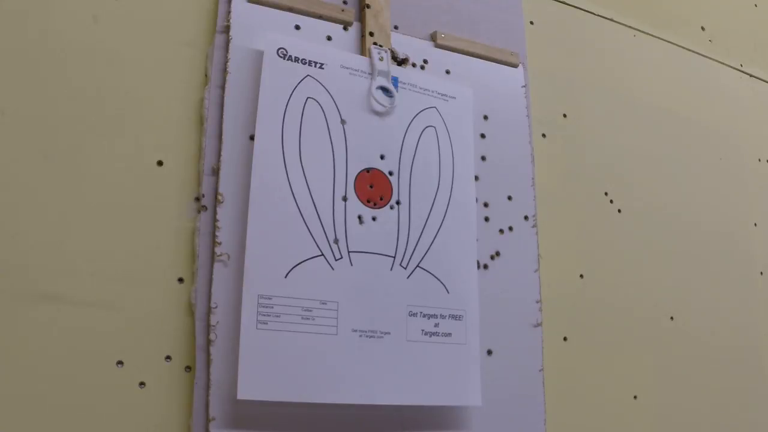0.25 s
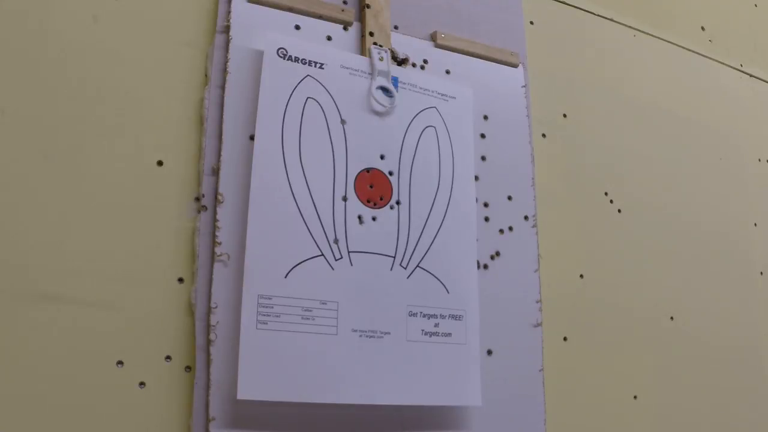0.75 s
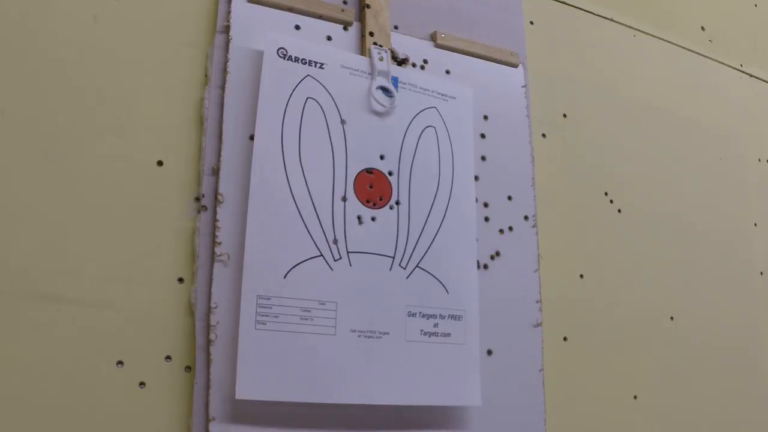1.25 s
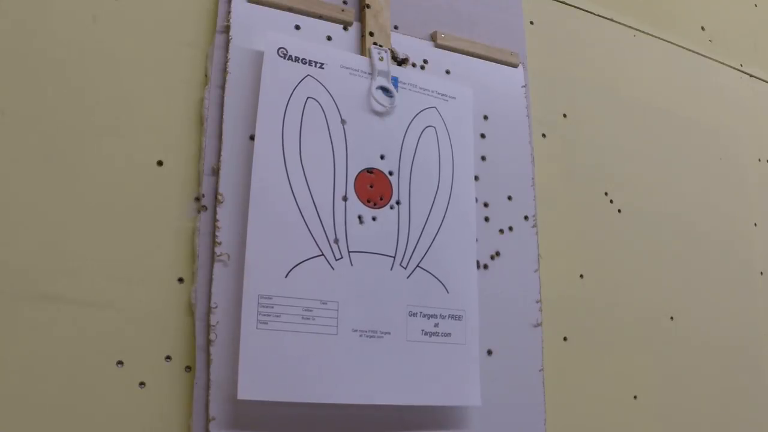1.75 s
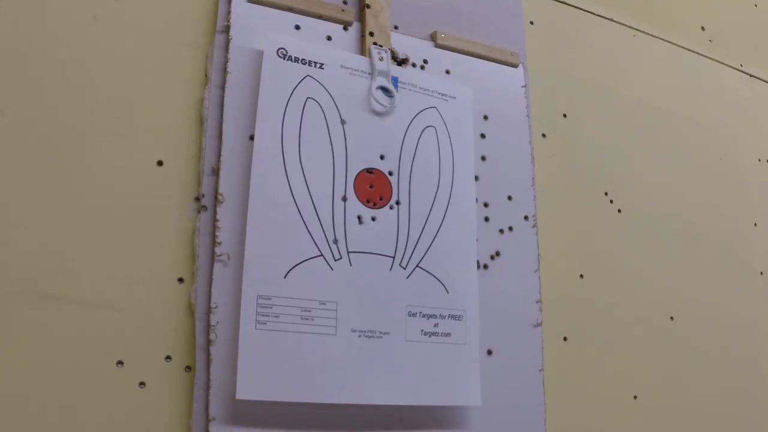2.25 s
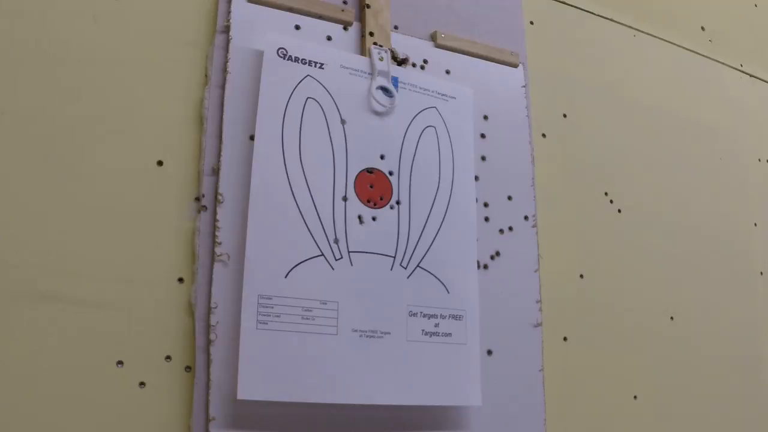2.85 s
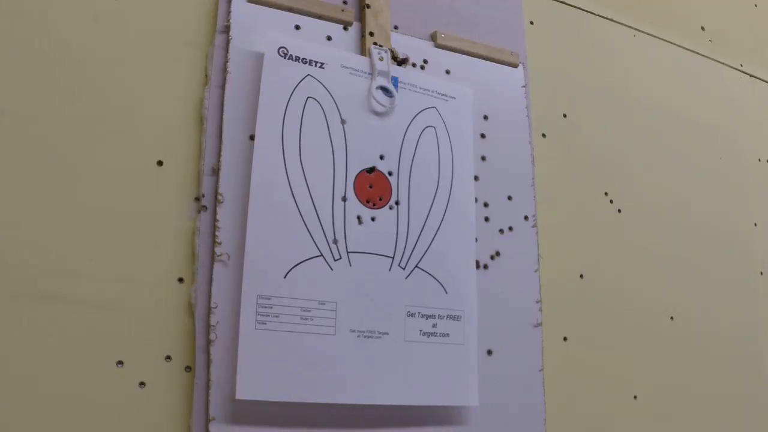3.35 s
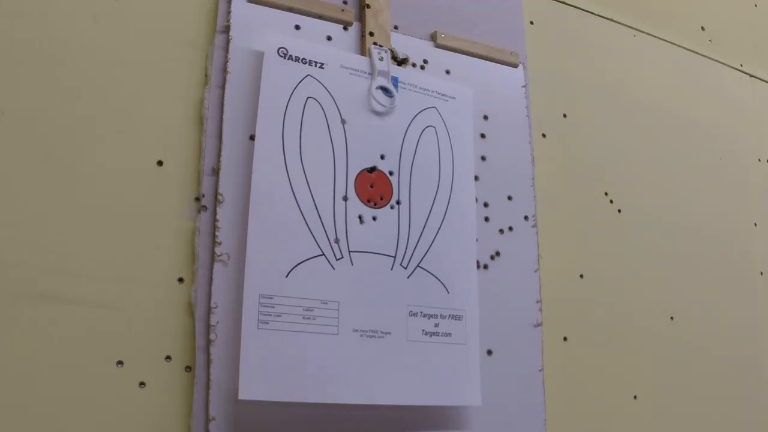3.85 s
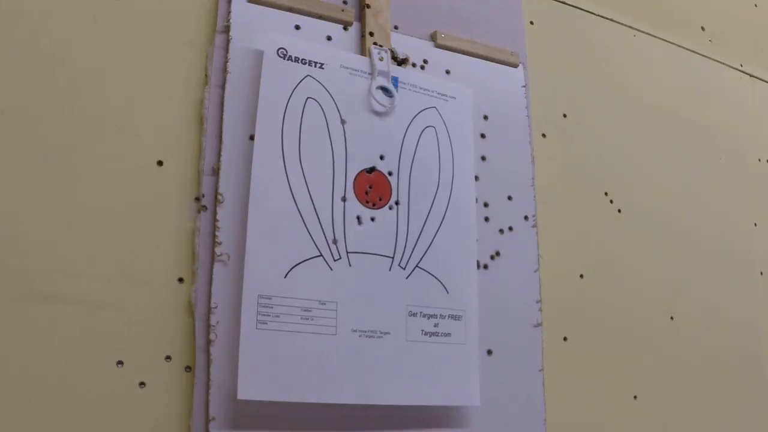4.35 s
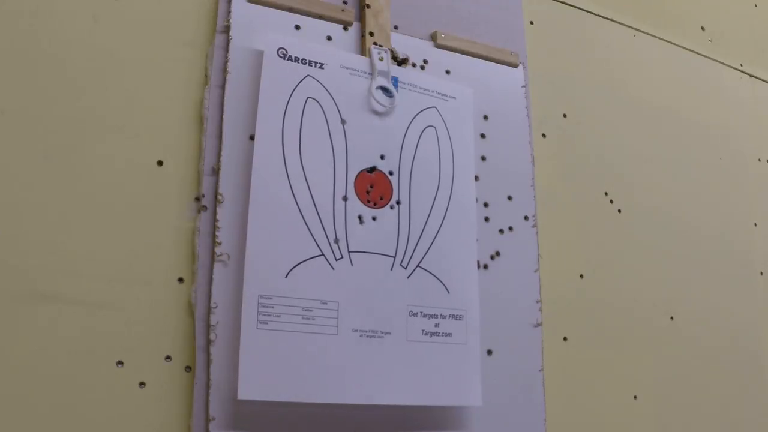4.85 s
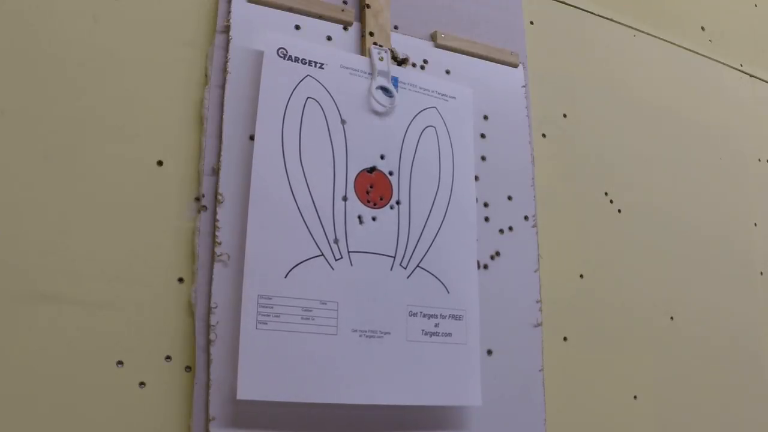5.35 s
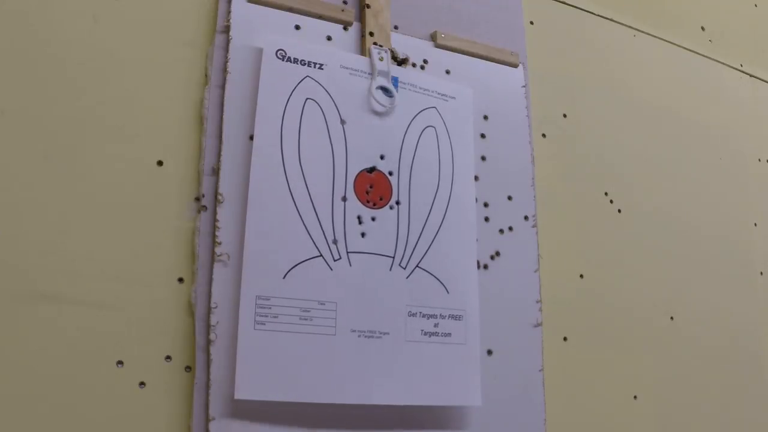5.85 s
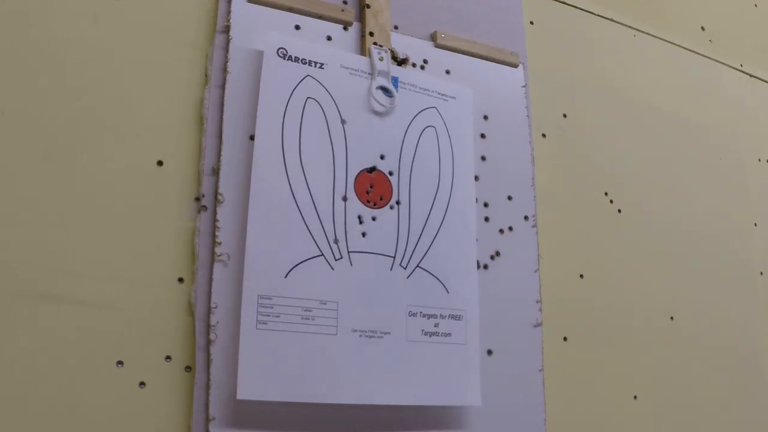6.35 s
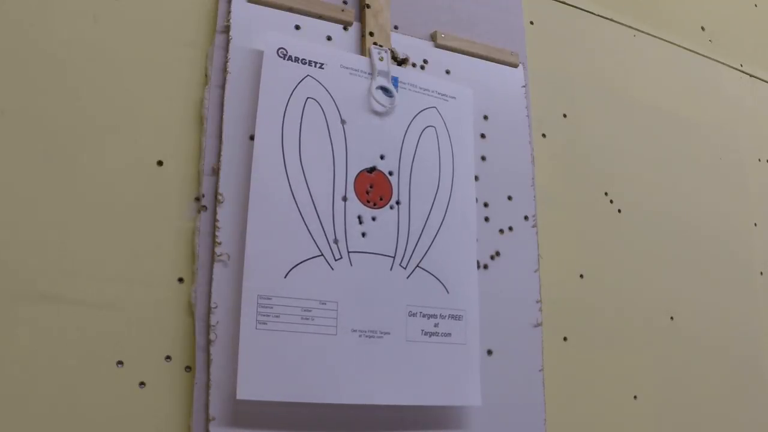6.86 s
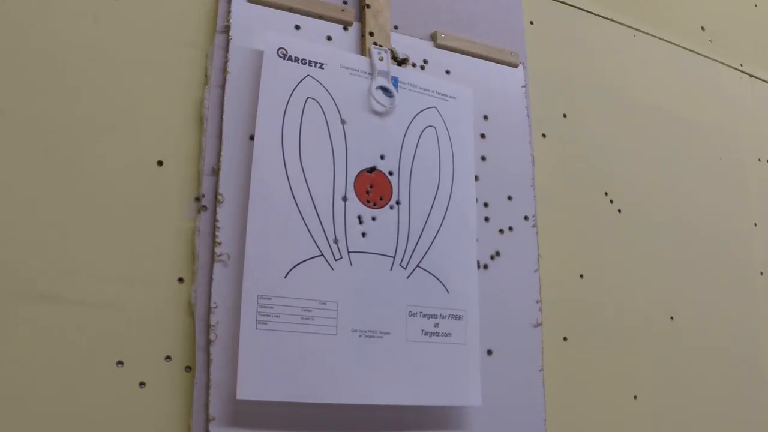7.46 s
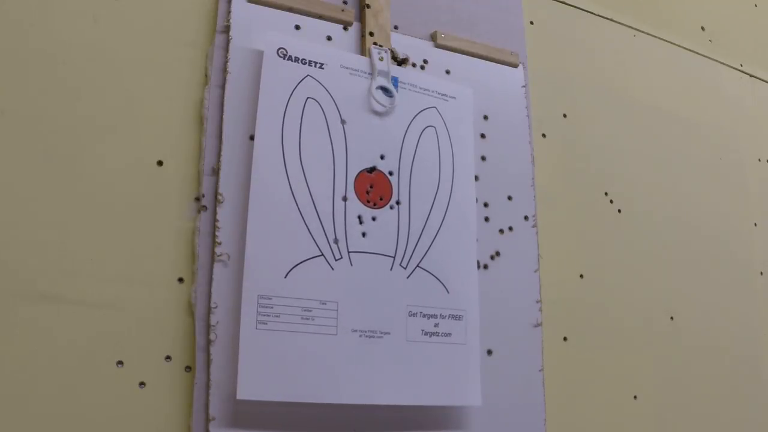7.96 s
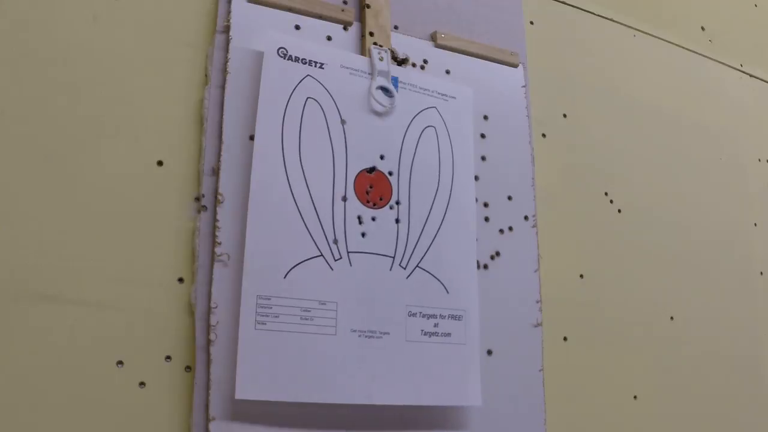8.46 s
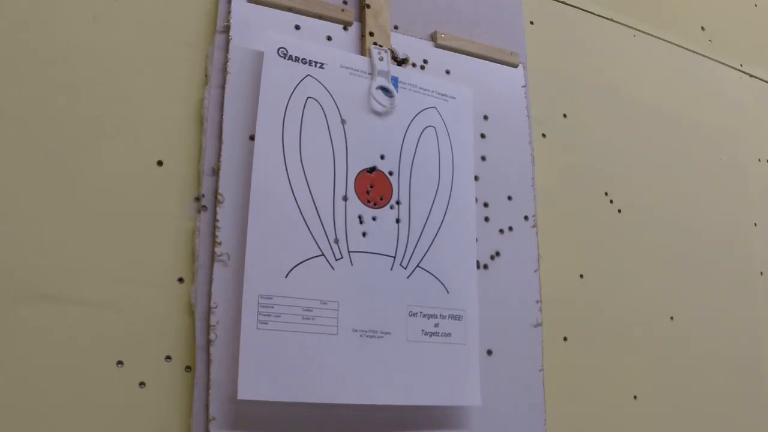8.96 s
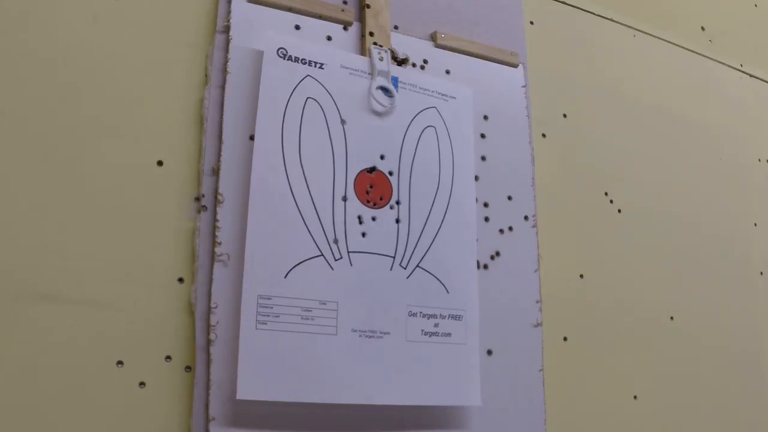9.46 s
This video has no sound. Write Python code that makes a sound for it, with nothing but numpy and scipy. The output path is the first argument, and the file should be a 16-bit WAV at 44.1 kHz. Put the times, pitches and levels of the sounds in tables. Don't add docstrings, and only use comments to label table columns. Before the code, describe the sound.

Heard from beside the target, five overloaded pistol cracks slap and echo through a hard hall, with spent cases clinking between them over rumbling air.

```python
import sys
import numpy as np
from scipy import signal
from scipy.fft import rfft, irfft
from scipy.io import wavfile

SR = 44100
rng = np.random.default_rng(int(sys.argv[2]) if len(sys.argv) > 2 else 0)


def wav_record(signal):
    frames = np.transpose(np.atleast_2d(signal))
    bounded = np.clip(frames, -1, 1)
    quanta = np.round(bounded * 32767).astype(np.int16)
    wavfile.write(sys.argv[1], SR, quanta)


def ratio_of_db(decibels):
    return 10 ** (np.asarray(decibels, float) / 20)


N = 427769


def band(x, hz, width):
    return signal.lfilter(*signal.iirpeak(hz, hz / width, fs=SR), x)


def level(x, db):
    return x * ratio_of_db(db) / np.sqrt(np.mean(x ** 2))


def read(table, hz):
    f, v = np.transpose(table)
    return np.interp(np.log(np.maximum(hz, 1)), np.log(f), v)


def coloured(table, size):
    hz = np.arange(size // 2 + 1) * SR / size
    spectrum = rfft(rng.standard_normal(size)) * ratio_of_db(read(table, hz))
    return level(irfft(spectrum, size), 0)


def walk(rate):
    knots = rng.standard_normal(int(N / SR * 40))
    return np.interp(np.arange(N) / SR * rate, np.arange(len(knots)), knots)


def split(x, hz, step):
    f = np.maximum(np.arange(len(x) // 2 + 1) * SR / len(x), 1)
    weight = np.maximum(1 - abs(np.log2(f / hz)) / step, 0)
    return irfft(rfft(x) * weight, len(x))


def add(out, s, sound):
    i = int(s * SR)
    out[i:i + len(sound)] += sound[:N - i]


# frequency in Hz, density in dB per Hz.
AIR = [(12, -36.5), (20, -4), (83, -2.5), (126, 1), (196, -15), (274, -17), (298, -27.5), (393, -34),
       (452, -41.5), (491, -34), (834, -31), (1270, -52), (12100, -65), (13500, -56), (15500, -57.5)]
# frequency in Hz, width in Hz, level in dB.
DUCT = [(127, 29, -43), (268, 9.4, -50.5)]
AIR_DB = -32.5


def ventilation():
    air, swell = coloured(AIR, N), walk(1.2)
    rumble = np.zeros(N)
    for hz in 15 * 2 ** np.arange(11):
        wander_db = (2.1 * swell + 2.0 * walk(6.8)) * (60 / hz) ** 0.26
        rumble += split(air, hz, 1) * ratio_of_db(wander_db)
    ducts = sum(level(band(rng.standard_normal(N), hz, width), db) for hz, width, db in DUCT)
    return level(rumble, AIR_DB) + ducts


WHINE_HZ, WHINE_RATE, WHINE_DB = 13150, 56, -77


def whine():
    gate = np.exp(-(np.arange(N) / SR * WHINE_RATE % 1) / .25)
    hiss = band(band(rng.standard_normal(N), WHINE_HZ, 900), WHINE_HZ, 900)
    return level(hiss * gate, WHINE_DB)


# frequency in Hz, width in Hz, level in dB.
HOUSING = [(288, 68, -5), (585, 100, 1.5), (1390, 100, -10), (2250, 710, -6), (3600, 720, -4.5),
           (3940, 310, -12.5), (5600, 680, -10.5), (8500, 2000, -16.5)]
RANGE_M, CEILING_M = 25, 3.3
BOUNCE = .8
BACKSTOP_S, BACKSTOP = .0228, -0.14


def blast(crackle):
    t = np.arange(len(crackle)) / SR
    direct_gas = 0.4 * np.exp(-t / 0.006)
    returned_gas = 0.084 * np.exp(-.5 * ((t - BACKSTOP_S - .003) / 0.0074) ** 2)
    paths = crackle * (direct_gas + returned_gas)
    for bounces in range(5):
        late = (np.hypot(RANGE_M, bounces * CEILING_M) - RANGE_M) / 343
        for s, strength in ((late, 1), (late + BACKSTOP_S, BACKSTOP)):
            blunt_s = .00005 + 0.00067 * s
            paths -= strength * BOUNCE ** bounces * np.exp(-.5 * ((t - s - .0001) / blunt_s) ** 2)
    case = sum(ratio_of_db(db) * hz ** -.5 * band(paths, hz, width) for hz, width, db in HOUSING)
    return case / abs(case).max()


def slap():
    t = np.arange(SR // 50) / SR
    return band(rng.standard_normal(len(t)), 8500, 7000) * np.exp(-t / 0.00083)


# frequency in Hz, density in dB per Hz.
HALL = [(88, -43.5), (150, -7.5), (205, -14), (244, -5), (411, -4.5), (530, -4.5), (618, -6), (796, -5),
        (1320, -16.5), (1450, -23.5), (3480, -22), (4650, -35.5), (8490, -48.5), (12000, -60.5),
        (15500, -84)]
# frequency in Hz, time to fall 60 dB in seconds.
HALL_T60 = [(250, 1.71), (500, 1.49), (1000, 1), (2000, 1), (3500, 0.92), (5200, 0.65), (8000, .68),
            (14000, 0.28)]
HALL_DB = -21


def hall():
    noise = coloured(HALL, 2 * SR)
    t = np.arange(2 * SR) / SR
    ring = np.zeros(2 * SR)
    for hz in 60 * 2 ** np.arange(0, 8.1, .5):
        ring += split(noise, hz, .5) * ratio_of_db(-60 * (t - .25) / read(HALL_T60, hz))
    build_up = 0.69 * (1 - np.exp(-t / 0.0063)) + 0.48 * (t > .022)
    return ring * ratio_of_db(HALL_DB) * build_up


# frequency in Hz, level in dB, time to fall 60 dB in seconds.
STANDING = [(247.8, -21.5, 2.6), (380, -23, 1.5)]
WHOOP_S, WHOOP_HZ, WHOOP_HZ_S, WHOOP_TOP_HZ = .027, 382.1, 8000, 950
WHOOP_DB, WHOOP_ATTACK_S, WHOOP_FADE_DB_S = -5.5, .008, 151


def tones():
    t = np.arange(2 * SR) / SR
    after = t - WHOOP_S
    hz = np.clip(WHOOP_HZ + WHOOP_HZ_S * after, 1, WHOOP_TOP_HZ)
    hz = hz * (1 + .05 * walk(70)[:2 * SR])
    db = WHOOP_DB - WHOOP_FADE_DB_S * np.maximum(after, 0) + 1.3 * walk(110)[:2 * SR]
    attack = np.clip(1 + after / WHOOP_ATTACK_S, 0, 1)
    out = ratio_of_db(db) * attack * np.sin(2 * np.pi * np.cumsum(hz) / SR)
    for hz, db, t60 in STANDING:
        out += ratio_of_db(db - 60 * t / t60) * np.sin(2 * np.pi * hz * t) * (1 - np.exp(-t / 0.015))
    return out


FAR_END_S, FAR_RISE_S, FAR_DB, FAR_FADE_DB_S = 0.25, .14, 7.5, 14.5


def far_end():
    t = np.arange(2 * SR) / SR - FAR_END_S
    return ratio_of_db(FAR_DB * np.clip(t / FAR_RISE_S, -1, 0) - FAR_FADE_DB_S * np.maximum(t, 0))


# start in seconds, blast level in dB, bullet slap delay in seconds, slap level in dB.
SHOTS = [
    (1.0546, 0, .0143, -8),
    (3.2768, 0, .0158, -8),
    (4.4375, 0, .0126, -8),
    (5.6385, 0, .0166, -7),
    (8.2300, 0, .0138, -9),
]


def pistol():
    out, ring = np.zeros(N), hall() + tones()
    crackle = rng.standard_normal((6, SR // 10))
    for (s, db, slap_s, slap_db), own in zip(SHOTS, crackle[1:]):
        add(out, s, ratio_of_db(db + 10) * blast(crackle[0] + .5 * own))
        add(out, s, ratio_of_db(db + 5.5) * far_end() * (ring + 0.56 * hall()))
        add(out, s + slap_s, ratio_of_db(slap_db + 13) * slap())
    return out


# start in
# seconds, level in dB, centre in Hz, treble share in dB.
CLINKS = [(1.609, -41.5, 3950, -4), (3.536, -37, 8500, -9), (3.711, -57, 8000, -9), (3.876, -35, 3600, -16),
          (4.161, -36, 3020, -17), (4.287, -48, 3600, -9), (4.991, -41, 3530, -18.5),
          (5.227, -37, 3100, -22), (5.563, -44, 4350, -13), (6.419, -29.5, 2740, -1),
          (6.430, -44, 4470, -8), (6.447, -29.5, 710, -14), (6.967, -40.5, 3800, -14),
          (6.985, -40, 2380, -19), (7.183, -50, 4220, -4), (7.205, -42, 2670, -15.5),
          (7.312, -46.5, 3430, -17), (8.751, -53.5, 2550, -17.5), (9.272, -58, 9020, -1.5)]
# start in seconds, level in dB, centre in Hz, treble share in dB.
KNOCKS = [
    (1.685, -45, 4700, -16),
    (1.870, -56, 8500, -3),
    (5.019, -55, 8530, -14),
    (6.445, -34.5, 2220, -9),
    (8.860, -47, 4000, -20),
    (8.969, -39.5, 3680, -8),
    (9.092, -51.5, 4460, -1),
    (9.416, -47, 3670, -5),
]
# start in seconds, frequency in Hz, level in dB.
BRASS = [
    (1.610, 11725, -66),
    (1.685, 11770, -42.5),
    (3.877, 12015, -64),
    (4.290, 12005, -66),
    (4.985, 11810, -71.5),
    (5.229, 11800, -56),
    (6.967, 12030, -79),
    (7.183, 12020, -63),
    (8.670, 11780, -61),
]
BRASS_T60_S = .2
CLINK_SHARE, KNOCK_SHARE = 0.57, 0.28


def clinks():
    out, t = np.zeros(N), np.arange(SR // 2) / SR
    taps = [(row, CLINK_SHARE) for row in CLINKS] + [(row, KNOCK_SHARE) for row in KNOCKS]
    for (s, db, hz, treble_db), share in taps:
        grains = ratio_of_db(1.9 * rng.exponential(size=len(t)))
        noise = rng.standard_normal((2, len(t))) * grains
        body = level(band(band(noise[0], hz, hz * share), hz, hz * share), 0)
        body = body * (ratio_of_db(-60 * t / 0.14) + 0.34 * ratio_of_db(-60 * t / 0.94))
        top = level(band(noise[1], 7800, 7000), treble_db)
        top = top * (ratio_of_db(-60 * t / 0.076) + .45 * ratio_of_db(-60 * t / 0.4))
        add(out, s, ratio_of_db(db - 11.0) * (body + top) * (1 - np.exp(-t / 0.0021)))
    for s, hz, db in BRASS:
        waver = 1 + 0.28 * np.cos(2 * np.pi * 45 * t)
        add(out, s, ratio_of_db(db - 60 * t / BRASS_T60_S) * waver * np.sin(2 * np.pi * hz * t))
    return out


def scene():
    return (ventilation() + whine() + pistol() + clinks())[None]


def top_cut(x):
    return signal.sosfilt(signal.butter(12, 16180, fs=SR, output="sos"), x)


DUCK_DB, DUCK_S, SINK_DB_S, HOLD_S, RECOVER_DB_S = -7, 0.0066, 4.5, 0.63, 19
TOP_HZ, HEADROOM = 14900, .86


def record(dry):
    t = np.arange(N) / SR
    fired = np.array([-9] + [row[0] for row in SHOTS])
    since = t - fired[np.searchsorted(fired, t) - 1]
    db = DUCK_DB * np.minimum(since / DUCK_S, 1) ** 4
    db = db - SINK_DB_S * np.minimum(since, HOLD_S) + RECOVER_DB_S * np.maximum(since - HOLD_S, 0)
    x = np.clip(dry * ratio_of_db(np.minimum(db, 0) + 1.0), -1, 1)
    x = signal.sosfilt(signal.butter(2, 10000, fs=SR, output="sos"), x)
    x = signal.sosfilt(signal.ellip(8, .3, 50, TOP_HZ, fs=SR, output="sos"), x)
    return top_cut(HEADROOM * x)


dry = scene()
out = record(dry)
wav_record(out)
```